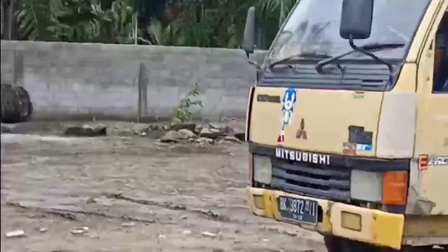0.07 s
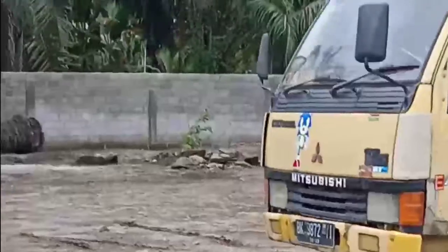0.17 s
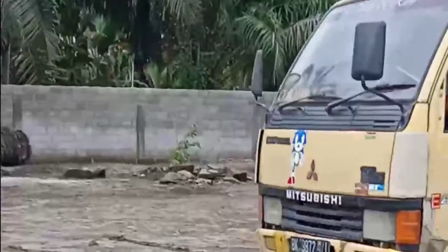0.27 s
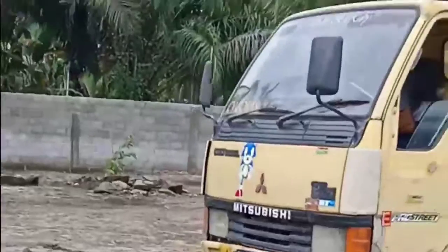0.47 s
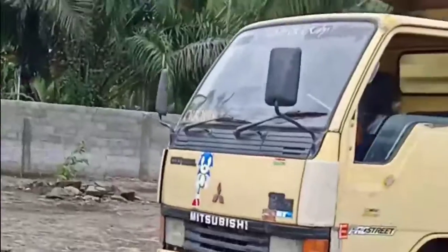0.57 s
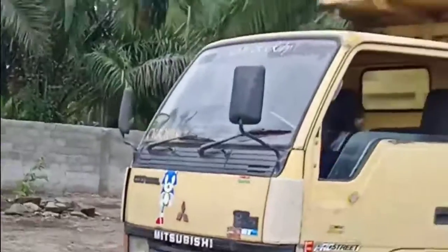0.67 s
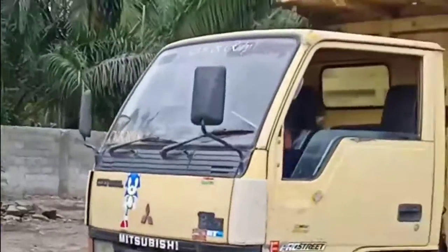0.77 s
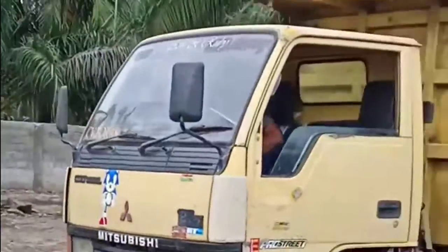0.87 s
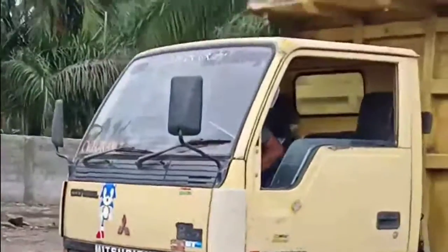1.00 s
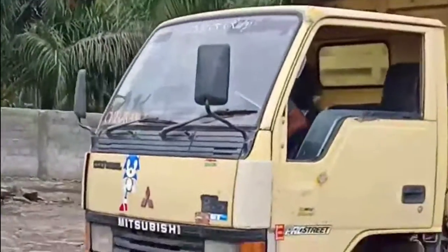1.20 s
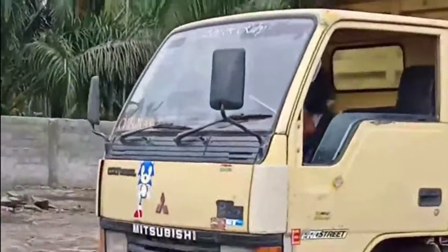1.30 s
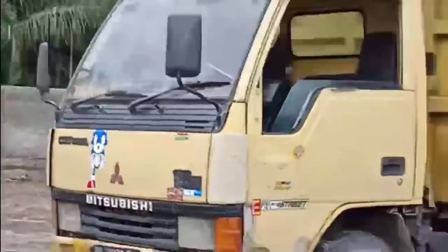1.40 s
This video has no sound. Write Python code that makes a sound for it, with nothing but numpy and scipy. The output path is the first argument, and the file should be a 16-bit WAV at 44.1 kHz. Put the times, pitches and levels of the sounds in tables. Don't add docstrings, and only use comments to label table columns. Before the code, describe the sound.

A truck's diesel engine idles throughout, about 33 quick knocks per second, with hard midrange clatter over lumpy low exhaust rumble and very faint hiss. At 0.2 s a loud, short, dull bump strikes the handheld phone, with tiny bounces; softer thuds follow near 0.43, 0.75, 0.9 and 1.39 s. At 1.04 s a metallic latch clacks, its rattle fading. Open yard, dry, muffled treble.

```python
import sys
import numpy as np
from scipy import signal
from scipy.fft import rfft, irfft
from scipy.io import wavfile
from scipy.ndimage import uniform_filter1d

SR = 44100
rng = np.random.default_rng(int(sys.argv[2]) if len(sys.argv) > 2 else 0)


def undo_db(level):
    steps = np.asarray(level, float) / 20
    return 10 ** steps


def generate_wav(signal):
    frames = np.transpose(np.atleast_2d(signal))
    scaled = np.clip(frames, -1, 1) * 32767
    pcm = np.round(scaled).astype(np.int16)
    wavfile.write(sys.argv[1], SR, pcm)


N = 63945

# [t/s, f/Hz]
FIRING_RATE = [(0, 33.2), (.4, 33.1), (.5, 32.6), (.95, 32.6), (1.45, 32.8)]
CYLINDER_LEVELS = [-1.1, -1.46, -1.3, 0.53]
# [t/s, level/dB]
ENGINE_LEVEL = [(0.0, -40), (0.682, -41.5), (1.146, -40.5), (1.45, -41)]
# [f/Hz, width/Hz, level/dB, drift/(dB per s)]
BLOCK_MODES = [(862, 110, -3, 4), (986, 32, -0.5, -4), (1085, 41, -2.5, -4.5), (1243.3, 40, -3, 3.5),
               (1376, 66, -4.5, -3.5), (1839, 38, -8.5, 3.5), (2007, 63, -6.5, -0.5), (2143, 180, -4, -0.5),
               (2335, 66, -9.5, -7.5), (2876, 130, -11.5, 4.5), (3216, 35, -16, -1), (4166, 210, -24, -5),
               (4800, 120, -37, 7.5)]
# [f/Hz, level/dB]
KNOCK_COLOUR = [(560, 2), (700, -6), (1200, -2), (1650, -11), (2100, -8), (3000, -13.5), (3700, -28.5),
                (5000, -51.5)]
# [multiple of firing rate, level/dB, waver/dB]
EXHAUST_TONES = [(2, -46.5, 1.2), (4, -52, 2.5), (5, -48.5, 2.2), (8, -54, 2.5), (10, -56, 2.5)]
# [f/Hz, level/dB]
RUMBLE_COLOUR = [(30, -5), (52, 6), (90, 9), (135, 7), (190, 4.5), (280, 7), (420, -1.5), (600, -12.5)]
# [f/Hz, level/dB]
HISS_COLOUR = [(5000, 3), (6000, -11.5), (7000, 0), (9300, 1.5), (10500, 8), (11800, -3.5), (15400, -20.5)]
# [t/s, level/dB]
HISS_LEVEL = [(0, 11.5), (.15, -5), (.3, -3), (.6, -2.5), (.75, 0.5), (1.45, 0)]
# [t/s, peak level/dB, first f/Hz, last f/Hz, t60/s]
HARD_BUMP = [
    (.2037, -.4, 375, 92, .027),
    (.2107, -13, 220, 115, .03),
    (.2331, -16, 250, 125, .03),
]
# [t/s, peak level/dB, first f/Hz, last f/Hz,
# t60/s]
SOFT_THUDS = [(0.219, -27, 136.6, 122.3, 0.069), (0.4275, -25.5, 106, 93.8, 0.086),
              (0.7512, -19, 186, 122, 0.043), (0.897, -22, 154, 146, 0.057), (0.9183, -28, 155, 129, 0.097),
              (1.0428, -31, 306, 170, 0.076), (1.3872, -26.5, 125, 118, 0.098),
              (.0005, -25, 200, 150, 0.044), (0.0695, -37, 593, 304, 0.027), (0.099, -38, 130, 90.6, 0.16),
              (1.0741, -27, 279, 167, 0.019), (1.1956, -27, 270, 162, 0.018), (1.317, -60, 285, 180, 0.029),
              (1.434, -32, 134, 119, 0.17)]


def evened(x):
    return x / np.sqrt(np.mean(x ** 2) + 1e-20)


def curve(points):
    s, value = np.transpose(points)
    return np.interp(np.arange(N) / SR, s, value)


def coloured(x, points, tilt=0.):
    f, db = np.transpose(points)
    hz = np.fft.rfftfreq(len(x), 1 / SR) + 1
    corners = np.r_[1, .8 * f[0], f, 1.25 * f[-1]]
    levels = np.r_[-99, db[0] - 20, db, db[-1] - 25]
    shape = np.interp(np.log(hz), np.log(corners), levels)
    return evened(irfft(rfft(x) * undo_db(shape) * hz ** tilt, len(x)))


def resonate(x, hz, width):
    r = np.exp(-np.pi * width / SR)
    return signal.lfilter([1 - r, 0, r - 1], [1, -2 * r * np.cos(2 * np.pi * hz / SR), r * r], x)


def wander(seconds):
    span = int(seconds * SR)
    return evened(uniform_filter1d(uniform_filter1d(rng.standard_normal(N), span), span))


def crank():
    turns = -.19 + np.cumsum(curve(FIRING_RATE)) / SR
    which = np.floor(turns).astype(int) + 4
    luck = rng.standard_normal((64, 2))
    return turns, np.array(CYLINDER_LEVELS)[which % 4], luck[which]


def combustion(turns, cyl_db, luck):
    attack, decay = 0.048, 0.31
    spread_db, bed = .8, 0.35
    part = turns % 1
    burst = np.minimum(part / attack, 1) * np.exp(-part / decay)
    burst = burst * undo_db(cyl_db + spread_db * luck[:, 0])
    return evened(bed + uniform_filter1d(burst, size=40))


def block_knock(turns, gate):
    rings = np.zeros(N)
    for hz, width, db, drift_db in BLOCK_MODES:
        strike = rng.standard_normal(N) * gate
        ring = evened(resonate(resonate(strike, hz, width), hz, 3 * width))
        drift = drift_db * (turns / 23.2 - 0.82)
        rings += undo_db(db + drift + 2.4 * wander(0.0084)) * ring
    broad = coloured(rng.standard_normal(N) * gate, KNOCK_COLOUR)
    level_db = curve(ENGINE_LEVEL)
    return undo_db(level_db - level_db.mean()) * (undo_db(-47) * evened(rings) + undo_db(-47.5) * broad)


def exhaust_puffs(turns, cyl_db, luck):
    hz, width, spread_db = 200, 233, 6.5
    fired = np.diff(np.floor(turns - .07), prepend=-1)
    fired = fired * undo_db(0.67 * cyl_db + spread_db * luck[:, 1])
    puffs = resonate(resonate(fired, hz, width), hz, 3.1 * width)
    return undo_db(-53) * evened(uniform_filter1d(puffs, size=40))


def exhaust_tones(turns):
    out = np.zeros(N)
    for k, db, waver_db in EXHAUST_TONES:
        level = np.sqrt(2) * undo_db(db + waver_db * wander(.07))
        out += level * np.cos(2 * np.pi * round(k) * turns + .25 * wander(.1))
    return out


def rumble():
    lumps_db = 0.82 * wander(0.01) + 0.47 * wander(0.017)
    return coloured(rng.standard_normal(N), RUMBLE_COLOUR) * undo_db(-40 + lumps_db)


def injector_hiss(gate):
    hiss = coloured(rng.standard_normal(N) * gate, HISS_COLOUR)
    return undo_db(-88 + curve(HISS_LEVEL)) * hiss


def bumps_and_pulses():
    sag_s, lead_turns, lead_db = .0018, .36, -6
    margin = 1000
    out = np.zeros(N + SR)
    t = np.arange(SR // 4) / SR
    for s, db, hz, rest_hz, t60 in HARD_BUMP + SOFT_THUDS:
        sweep = rest_hz + (hz - rest_hz) * np.exp(-t / sag_s)
        lead = lead_turns / hz
        swing = undo_db(db - 60 * t / t60) * np.sin(2 * np.pi * np.cumsum(sweep) / SR)
        dip = -undo_db(db + lead_db) * np.sin(np.pi * np.minimum(t / lead, 1)) ** 2
        at = round(s * SR) + margin
        out[at:at + len(t)] += swing
        out[at - round(lead * SR):][:len(t)] += dip
    dull = signal.butter(3, 1400, fs=SR, output="sos")
    return signal.sosfiltfilt(dull, out)[margin:N + margin]


def latch_clack():
    start_s, rise_s, t60 = 1.0365, .001, .42
    t = np.maximum(np.arange(N) / SR - start_s, 0)
    rattle, sizzle, strike = rng.standard_normal((3, N))
    high = evened(resonate(resonate(strike, 4900, 600), 4900, 600))
    low = evened(resonate(resonate(strike, 3250, 250), 3250, 400))
    ring = undo_db(-19 - 60 * t / .3) * high + undo_db(-7 - 60 * t / .2) * low
    shape = np.minimum(t / rise_s, 1) * undo_db(-41.5 - 60 * t / t60)
    snap = shape * (coloured(rattle, KNOCK_COLOUR, tilt=1.2) + ring)
    top = shape * undo_db(-32 - 60 * t / .06) * coloured(sizzle, [(5500, -3), (14000, -9)])
    return snap, top


def rustle_and_air(thuds):
    noise = coloured(rng.standard_normal(N), [(6000, 0), (15300, -2)])
    return (undo_db(-73.5) * abs(thuds) + undo_db(-100)) * noise


def scene():
    turns, cyl_db, luck = crank()
    gate = combustion(turns, cyl_db, luck)
    engine = block_knock(turns, gate) + exhaust_puffs(turns, cyl_db, luck) + exhaust_tones(turns)
    thuds = bumps_and_pulses()
    snap, top = latch_clack()
    mic_edge = signal.butter(5, 4520, fs=SR, output="sos")
    dull = signal.sosfilt(mic_edge, engine + rumble() + snap + thuds)
    return (dull + injector_hiss(gate) + top + rustle_and_air(thuds))[None]


def roll_off(x):
    return signal.sosfilt(signal.butter(12, 15460, fs=SR, output="sos"), x)


def record(dry):
    thin = signal.sosfilt(signal.butter(2, 56, "high", fs=SR, output="sos"), dry)
    return roll_off(thin)


dry = scene()
out = record(dry)
generate_wav(out)
```